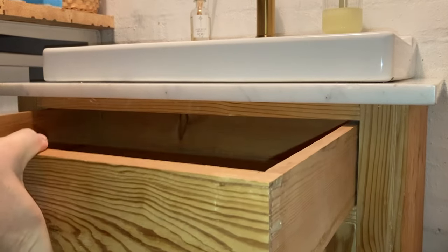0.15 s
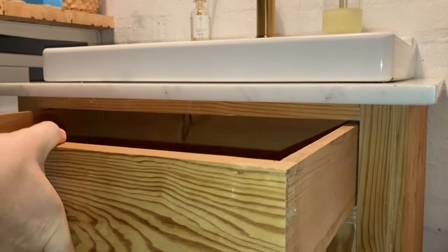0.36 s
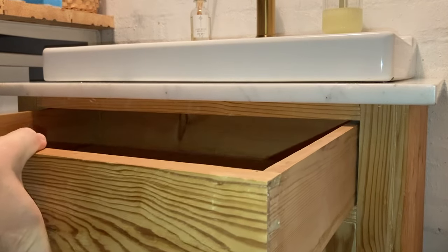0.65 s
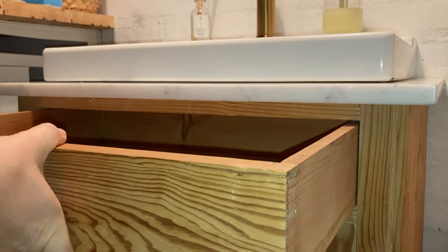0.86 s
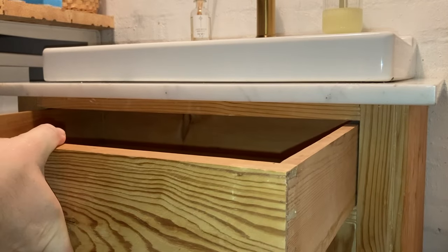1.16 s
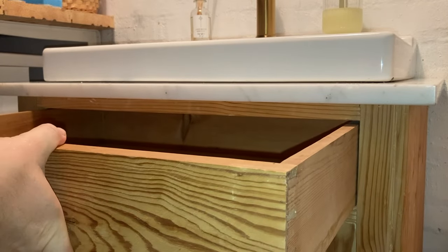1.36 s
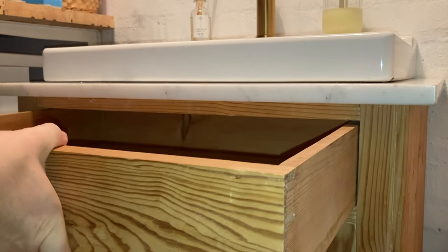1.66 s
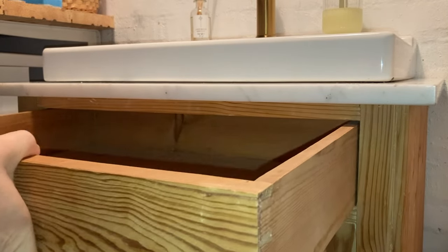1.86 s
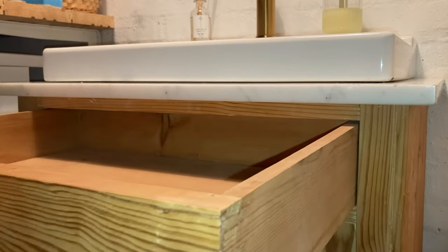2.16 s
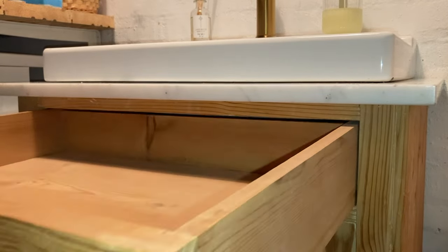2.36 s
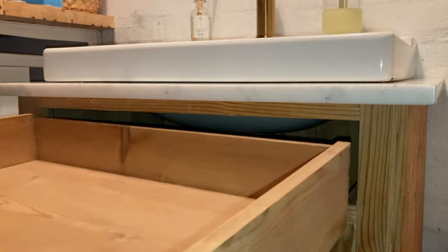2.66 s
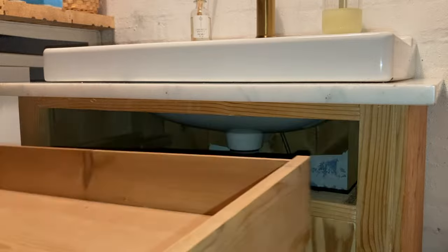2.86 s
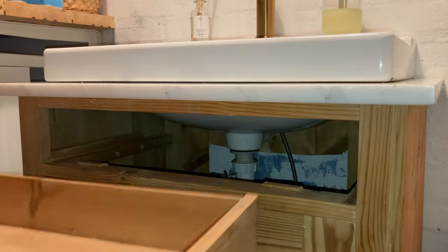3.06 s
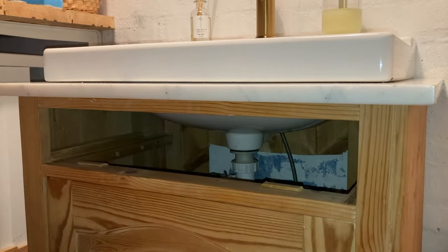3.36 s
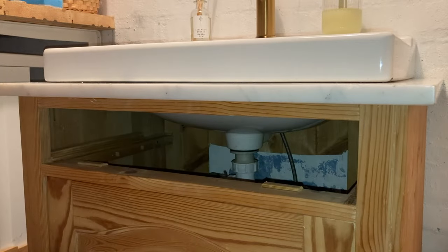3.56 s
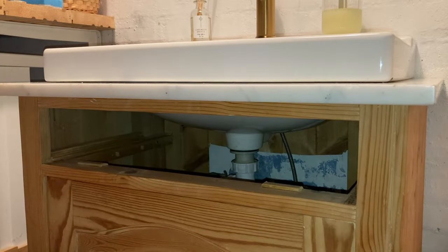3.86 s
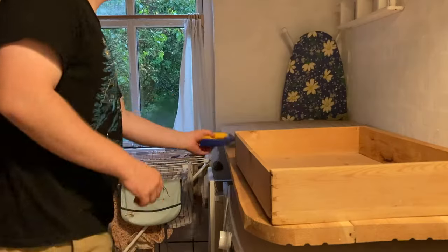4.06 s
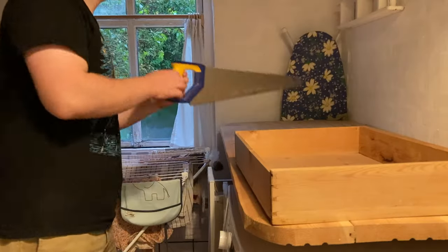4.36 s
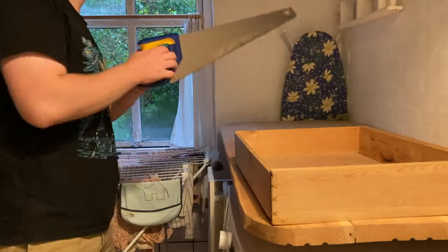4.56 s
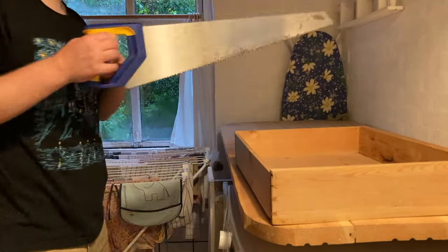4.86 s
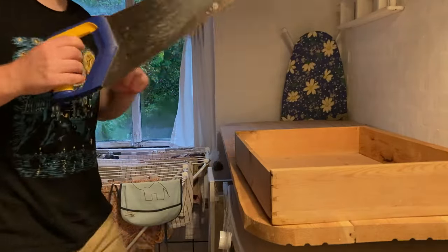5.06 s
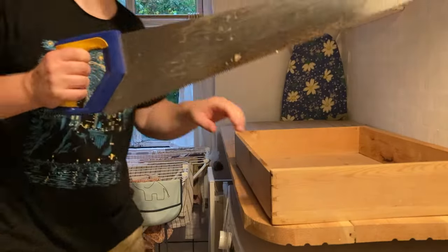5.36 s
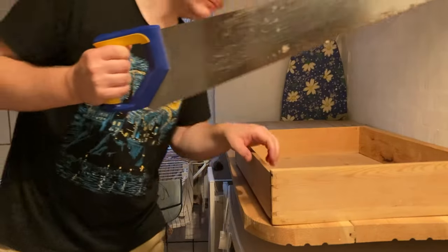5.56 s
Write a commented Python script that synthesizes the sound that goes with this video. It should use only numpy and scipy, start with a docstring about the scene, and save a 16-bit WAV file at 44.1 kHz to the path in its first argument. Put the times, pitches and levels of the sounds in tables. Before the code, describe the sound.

Close mono pickup in a small, lively room. A hollow wooden box bumps and rubs, hits its stop hard twice, then bumps softly again and slides out over uneven runners, dropping off with a dull thump. After light ticks and rustling, the place changes to a softly humming workroom: one short steel-on-wood scrape, faint airy blade swishes, a tiny ting and clothing movements.

```python
"""A pine drawer in a bathroom cabinet is jiggled on its wooden runners, knocks twice on its stop and is pulled out.
Clicks and short shudders ring the modes of its box; noise bursts crack; friction noise rubs and wavering sines groan.
Afterwards, in a workroom, a handsaw is dragged off a bench: rasping noise rings steel and wood.
The raised blade swishes as filtered noise and tings in gliding sines. Noise also makes clothes, air, hum and hiss.
"""
import sys
import numpy as np
from scipy import signal
from scipy.fft import rfft, irfft
from scipy.io import wavfile

SR = 44100
rng = np.random.default_rng(int(sys.argv[2]) if len(sys.argv) > 2 else 0)


def generate_wav(signal):
    """Clip the signal to [-1, 1] and save it as 16-bit WAV at the path in sys.argv[1]."""
    frames = np.transpose(np.atleast_2d(signal))
    scaled = np.clip(frames, -1, 1) * 32767
    pcm = np.round(scaled).astype(np.int16)
    wavfile.write(sys.argv[1], SR, pcm)


N = 251800  # samples

# modes of the drawer box, before the ring limit: mode_hz, level_db (relative), t60_s
BOX_MODES = [(65, -47.5, 0.72), (85.7, -39, 0.21), (117.5, -33.5, 0.45), (136, -35.5, 0.18),
             (165.3, -44, 0.28), (195.6, -45.5, 0.17), (276.5, -22.5, 0.058), (320.4, -20.5, .13),
             (355, -28, 0.27), (425, -27, 0.069), (525, -16, 0.018), (567, -30.5, 0.15),
             (608.4, -31, 0.097), (700, -23.5, 0.055), (815, -30.5, 0.041), (853, -29.5, 0.18),
             (978.3, -18.5, 0.033), (984, -34, 0.083), (1136, -36, 0.15), (1393, -22.5, 0.021),
             (1712, -35, 0.05), (1866, -24.5, 0.02), (2416, -31.5, 0.025), (2638, -29.5, .024),
             (3282, -31, 0.027), (4383, -41.5, 0.027), (5355, -39.5, 0.019)]
LONGEST_RING_S, LONGEST_RING_CYCLES = 0.29, 90  # wood never rings longer than this


def drawer(force, travel_s=0.0016):
    """The box rings, damped by the hand; bending waves carry highs across the boards sooner than lows."""
    out = np.zeros(N)
    for k, (hz, db, t60) in enumerate(BOX_MODES):
        t60 = min(t60, LONGEST_RING_S, LONGEST_RING_CYCLES / hz)
        mode = (-1) ** k * from_db(db) * ring(force, hz, t60)
        arrival_s = travel_s * np.sqrt(500 / hz)  # travel_s is the delay at 500 Hz
        add(out, arrival_s, mode)
    return out


# hard knocks on the stop, one corner about 5 ms ahead of the other:
# start_s, strength_db (relative), corner_hz (brightness of the click)
STOP_KNOCKS = [(0.3122, 3.5, 8950), (0.3169, -6.5, 3017), (0.8166, 2.5, 8000), (0.8217, -5.5, 2910)]
SHORTEST_SHUDDER_S = 0.0016


def blows(shudder_cycles=0.78):
    """Force on the box: sharp clicks at the stop, short rounded shudders for jolts and ticks."""
    force = np.zeros(N)
    click = signal.unit_impulse(SR // 8)
    for s, db, corner_hz in STOP_KNOCKS:
        add(force, s, from_db(db) * passband(click, corner_hz, "low", order=1))
    for s, db, hz in pushes():
        width_s = max(shudder_cycles / hz, SHORTEST_SHUDDER_S)
        t = np.arange(-3 * width_s, 3 * width_s, 1 / SR)
        shudder = np.cos(2 * np.pi * hz * t) * np.exp(-(t / width_s) ** 2)
        add(force, s + t[0], from_db(db) * shudder / (width_s * SR))
    return force


# soft jolts on the runners, then two light ticks after the pull:
# centre_s, tap_db (relative), tap_hz, thud_db (relative)
JOLTS_AND_TICKS = [(.008, -35.5, 540, -12), (.068, -9, 690, 9.5), (.109, -3.5, 610, 6.5),
                   (0.577, -14.5, 580, 2), (.656, -16.5, 560, -1), (1.473, -24.5, 800, -12.5),
                   (1.552, -36.5, 590, -11), (1.648, -28, 720, -10), (1.749, -9.5, 640, 6),
                   (1.787, -13.5, 650, 3.5), (1.824, -16.5, 590, -1.5), (2.622, -44.5, 806, -9.5),
                   (3.226, -31.5, 1270, -27.5), (3.828, -40, 330, -36)]
# low shudders that follow each tap: delay_s, pitch_hz, level_db (relative to the thud)
SETTLING_SHUDDERS = [(.016, 180, -4.5), (.023, 320, -22), (.035, 130, -1)]
# every tap has a brighter edge and rebounds once; ratios and dB are relative to the tap
EDGE_RATIO, EDGE_DB, EDGE_LAG_S = 1.8, -4.5, 0.0022
REBOUND_RATIO, REBOUND_DB, REBOUND_S = 0.92, 0.5, 0.012


def pushes():
    """Each jolt or tick is a tap with its edge and rebound, then low settling: centre_s, level_db, pitch_hz."""
    for s, tap_db, hz, thud_db in JOLTS_AND_TICKS:
        yield s, tap_db, hz
        yield s + EDGE_LAG_S, tap_db + EDGE_DB, hz * EDGE_RATIO
        yield s + REBOUND_S, tap_db + REBOUND_DB, hz * REBOUND_RATIO
        for delay_s, low_hz, db in SETTLING_SHUDDERS:
            yield s + delay_s, thud_db + db, low_hz


# dry little catches of wood grain, and one late dry tick: start_s, level_db (relative)
CATCHES_AND_TICK = [(0.067, -46.5), (.109, -33.5), (0.571, -69), (0.661, -45), (1.472, -48.5), (1.493, -60),
                    (1.651, -49.5), (3.226, -57)]


def cracks(stop_db=-15, snap_db=-22, bite_s=0.0019):
    """The stop bites within a moment, with one crack for every knock; each catch or tick is a fresh burst."""
    out = np.zeros(N)
    stop = crack(t60=0.05, low_hz=603, high_hz=1200)
    stop = stop * np.minimum(np.arange(len(stop)) / SR / bite_s, 1)
    snap = crack(t60=0.0016, low_hz=9100, high_hz=14720)
    contact = from_db(stop_db) * stop + from_db(snap_db) * snap
    for s, db, corner_hz in STOP_KNOCKS:
        # the crack is duller than the click: half its corner frequency
        add(out, s, from_db(db) * passband(contact, 0.5 * corner_hz, "low", order=1))
    for s, db in CATCHES_AND_TICK:
        add(out, s, from_db(db) * crack(t60=0.027, low_hz=875, high_hz=3916))
    return out


def crack(t60, low_hz, high_hz):
    """The crowd of short-lived high modes right at a contact, as a decaying noise burst."""
    t = np.arange(SR // 8) / SR
    burst = rng.standard_normal(len(t)) * from_db(-60 * t / t60)
    dulled = passband(burst, high_hz, "low", order=1)
    return passband(dulled, low_hz, "high")


# the long pull, level of its rubbing: time_s, level_db (relative)
LONG_PULL = [(1.72, -81), (1.746, -67), (1.898, -62.5), (2.002, -69), (2.276, -68.5), (2.33, -64.5),
             (2.544, -60.5), (2.648, -66), (2.76, -104)]
# short hard rubs as the drawer is jiggled or binds: peak_s, length_s, level_db (relative)
BINDING_RUBS = [(.12, 0.14, -51.5), (.295, 0.35, -58.5), (.585, 0.19, -60), (.662, 0.087, -60),
                (.795, 0.21, -58.5), (1.497, .06, -56), (1.585, 0.11, -67), (1.71, 0.21, -70.5),
                (2.425, 0.41, -56)]
# colour of the hiss: frequency_hz, density_db (dB per Hz, relative)
RUB_COLOUR = [(290, -39), (500, -10.5), (537, -21.5), (668, -15), (728, -19), (794, -5), (1000, -1.5),
              (1240, -11.5), (1970, -11), (8490, -23.5), (14700, -29), (15800, -36.5)]
# colour of the runner rumble: frequency_hz, density_db (dB per Hz, relative)
RUMBLE_COLOUR = [(40, -29.5), (65, -3), (95, 7), (140, -5.5), (220, -2), (400, -28)]


def sliding(hiss_db=-3, box_db=-6, rumble_db=1, pull_db=6):
    """Wood on wood: a soft hiss, the box humming under it, and a rumble from the uneven runners."""
    pull = from_db(pull_db) * level(LONG_PULL)
    rub = pull + strokes(BINDING_RUBS, rise_share=0.62, roundness=1.4)
    hiss = colour(friction(grain_db=2.0, slip_db=3.5, slips_per_s=170), RUB_COLOUR)
    box_force = passband(friction(grain_db=1.0, slip_db=-2.0, slips_per_s=13), 600, "high", order=1)
    box = rms_one(drawer(box_force))
    rumble = colour(friction(grain_db=3.5, slip_db=2.5, slips_per_s=35), RUMBLE_COLOUR)
    rubbing = rub * (from_db(hiss_db) * hiss + from_db(box_db) * box)
    return rubbing + from_db(rumble_db) * pull * rumble


# brief groans of the runners, and a low thump (at 2.62 s) as the drawer drops off them:
# start_s, length_s, pitch_hz (centre), level_db (before the waver)
GROANS_AND_THUMP = [(1.98, 0.091, 349.7, -47.5), (2.06, 0.11, 242, -57), (2.37, 0.13, 346, -56.5),
                    (2.62, 0.063, 142, -40.5), (2.68, 0.15, 171.8, -59.5)]


def groans_and_thump(waver=0.027):
    """Stick and slip groans on one pitch, and the drop thumps; all are short sines wavering in pitch and level."""
    out = np.zeros(N)
    for s, length, hz, db in GROANS_AND_THUMP:
        t = np.arange(round(length * SR)) / SR
        wobble = np.interp(t * 70, np.arange(SR), rng.standard_normal(SR))
        tone = np.sin(2 * np.pi * np.cumsum(hz * (1 + waver * wobble)) / SR)
        swell = np.sin(np.pi * t / length)
        add(out, s, from_db(db + 3.6 * wobble) * swell * tone)
    return out


# the saw shifts as it is gripped, then is dragged off the bench:
# peak_s, length_s, teeth_db (relative), bench_top_db (relative)
SAW_DRAGS = [(3.985, 0.078, -77.5, -57.5), (4.133, 0.21, -45.5, -43)]
BENCH_LAG_S = 0.034  # the wood speaks up a little after the teeth
# colour of the teeth: frequency_hz, density_db (dB per Hz, relative)
TEETH_COLOUR = [(800, -22), (1250, -19), (1500, -2), (1850, -1.5), (2700, -8.5), (3800, -7.5), (4800, -7),
                (6200, -6.5), (10000, -7), (14500, -1), (15800, 3.5)]
# bench resonances: centre_hz, width_hz, level_db (relative)
BENCH_MODES = [(432.3, 40, 5.5), (750, 26, -11), (970, 51, -7), (1195, 28, -6)]
# broad colour of the bench top: frequency_hz, density_db (dB per Hz, relative)
BENCH_TOP_COLOUR = [(160, -16), (240, -1.5), (340, -18), (450, 4.5), (600, 2), (700, -7), (950, -3.5),
                    (1300, -9.5), (2000, -30.5)]


def handsaw(teeth_db=-2, bench_db=-8, top_db=-4, steel_db=-11):
    """Steel teeth rasp over the bench top; the wood resonates and many close blade modes ring on."""
    rasp = friction(grain_db=5.5, slip_db=2.5, slips_per_s=140)
    bench = np.zeros(N)
    for hz, width, db in BENCH_MODES:
        t60 = np.log(1000) / np.pi / width
        bench += from_db(db) * width * ring(rasp, hz, t60)
    wood = from_db(bench_db) * rms_one(bench) + from_db(top_db) * colour(rasp, BENCH_TOP_COLOUR)
    teeth = strokes(SAW_DRAGS, rise_share=0.31, roundness=1.84) * colour(rasp, TEETH_COLOUR)
    presses = [(s + BENCH_LAG_S, length, db) for s, length, _, db in SAW_DRAGS]
    pressure = strokes(presses, rise_share=0.44, roundness=1.37)
    steel = rms_one(sum(ring(teeth, hz, t60=0.064) for hz in rng.uniform(2300, 12000, size=30)))
    return from_db(teeth_db) * teeth + from_db(steel_db) * np.std(teeth) * steel + pressure * wood


# the blade is swung up: peak_s, length_s, level_db
BLADE_SWINGS = [(4.39, 0.26, -72), (4.575, 0.23, -69.5), (4.82, 0.17, -77.5)]
# colour of the swish: frequency_hz, density_db (dB per Hz, relative)
SWISH_COLOUR = [(900, -20.5), (1500, -2.5), (2000, 0.5), (2600, -8.5), (4000, -14.5), (9000, -13)]
# the raised blade flexes with a faint ting: start_s, level_db (relative)
BLADE_FLEXES = [(4.843, -60)]
# blade modes before stiffening: mode_hz, level_db (relative), t60_s
BLADE_MODES = [(1200, -4, 0.054), (1650, -1, .07), (1930, -2, 0.095), (2300, -4.5, 0.14), (2620, -11, 0.35),
               (2690, -9.5, 0.79)]


def blade(stiffening=0.16, bend_s=0.02, shiver=0.029):
    """Thin steel swishes through the air, then tings; bending stiffens it, so its modes glide up, shivering."""
    out = strokes(BLADE_SWINGS, rise_share=0.41, roundness=1.7) * colour(rng.standard_normal(N), SWISH_COLOUR)
    t = np.arange(SR // 2) / SR
    glide = stiffening * (1 - np.exp(-t / bend_s))
    ting = np.zeros(len(t))
    for hz, db, t60 in BLADE_MODES:
        wobble = np.interp(t * 300, np.arange(SR), rng.standard_normal(SR))
        pitch_hz = hz * (1 + glide + shiver * wobble)
        ting += from_db(db - 60 * t / t60) * np.sin(2 * np.pi * np.cumsum(pitch_hz) / SR)
    for s, db in BLADE_FLEXES:
        add(out, s, from_db(db) * ting)
    return out


# clothes and hands: peak_s, length_s, level_db (relative)
RUSTLES = [(3.362, 0.088, -63.5), (3.464, 0.065, -61.5), (3.548, 0.052, -66.5), (3.67, 0.19, -70),
           (3.84, 0.36, -69), (3.99, 0.13, -75), (4.41, .2, -71.5), (4.752, 0.21, -64),
           (5.008, 0.14, -62.5), (5.22, .12, -66.5), (5.408, 0.17, -63), (5.55, 0.21, -79.5)]
# colour of the cloth: frequency_hz, density_db (dB per Hz, relative)
CLOTH_COLOUR = [(300, -26), (700, -6.5), (1800, -4), (3500, -10), (6000, -7.5), (10000, -11), (15000, -8)]


def clothes(cloth_db=-1):
    """Clothes and hands rustle: grainy friction noise swelling with each movement."""
    movement = strokes(RUSTLES, rise_share=0.43, roundness=1.6)
    grain = friction(grain_db=4.5, slip_db=1.5, slips_per_s=69)
    return from_db(cloth_db) * movement * colour(grain, CLOTH_COLOUR)


# colour of the still air: frequency_hz, density_db (dB per Hz, relative)
AIR_COLOUR = [(45, -9), (60, 2), (90, -10.5), (150, -8.5), (300, -9), (600, -15.5), (1500, -20),
              (4000, -26), (9000, -31), (15000, -30)]
AIR_DB = -68.5


def still_air():
    """Steady noise, densest in the bass."""
    return from_db(AIR_DB) * colour(rng.standard_normal(N), AIR_COLOUR)


# low hum near 52 Hz and hiss above 1 kHz: frequency_hz, density_db (dB per Hz, relative)
HUM_AND_HISS_COLOUR = [(42, -25), (52, 20), (70, -20), (150, -29), (400, -39), (1000, -8)]
WORKROOM_S, WORKROOM_DB = 3.85, -77.5  # start and level of this noise


def workroom_hum_and_hiss():
    """Noise with a low hum near 52 Hz and a hiss above 1 kHz, present from the start of the workroom on."""
    present = np.arange(N) / SR > WORKROOM_S
    return from_db(WORKROOM_DB) * present * colour(rng.standard_normal(N), HUM_AND_HISS_COLOUR)


# reverberation time: frequency_hz, t60_s
REVERB_T60 = [(70, .52), (130, .38), (300, .45), (700, .36), (1840, .33), (4850, .27), (12800, .21)]
# reverberation strength: frequency_hz, level_db (relative)
REVERB_GAIN = [(70, -3), (130, -5.5), (220, 0.5), (330, -3.5), (700, -5.5), (1500, -2.5), (3000, -3),
               (6000, -5), (14000, -14)]


def room_tail(first_echo_s, build_s):
    """Diffuse reflections of a small hard room, dying faster in the treble."""
    t = np.arange(SR) / SR
    white = rng.standard_normal((3, SR))
    tail = np.zeros(SR)
    edges_hz = 50 * 2 ** np.arange(0, 8.5, 0.2)
    onset = np.clip((t - first_echo_s) / build_s, 0, 1)
    for k, (low, high) in enumerate(zip(edges_hz, edges_hz[1:])):
        hz = np.sqrt(low * high)
        # reversed: at full strength from the start
        steady = passband(white[k % len(white)], [low, high], "band")[::-1]
        band = steady * onset * from_db(-60 * t / at_hz(REVERB_T60, hz))
        tail += rms_one(band) * np.sqrt(2 * (high - low)) / SR * from_db(at_hz(REVERB_GAIN, hz))
    return tail


def friction(grain_db, slip_db, slips_per_s):
    """Countless tiny collisions of uneven size, bunched by stick and slip."""
    knots = np.arange(N) / SR * slips_per_s
    slips = np.interp(knots, np.arange(N), rng.standard_normal(N))
    unevenness_db = grain_db * rng.standard_normal(N) + slip_db * slips
    return rms_one(rng.standard_normal(N) * from_db(unevenness_db))


def strokes(rows, rise_share, roundness):
    """Gain of hand strokes: each swells to its peak and fades, 20 dB down at both ends of its length."""
    t = np.arange(N) / SR
    gain = np.zeros(N)
    for row in rows:
        peak_s, length_s, db = row[:3]
        away = (t - peak_s) / length_s
        reach = np.minimum(np.maximum(-away / rise_share, away / (1 - rise_share)), 10)
        gain += from_db(db - 20 * reach ** roundness)
    return gain


def ring(force, hz, t60):
    """A resonator: a unit click sets a decaying sine of height 1 ringing."""
    r = from_db(-60 / (t60 * SR))
    w = 2 * np.pi * hz / SR
    return signal.lfilter([0, np.sin(w)], [1, -2 * r * np.cos(w), r * r], force + 1e-18)


def colour(x, spectrum):
    """Give a steady noise a spectrum that falls away below its lowest point; rms 1."""
    hz = np.arange(N // 2 + 1) * SR / N
    skirt = np.minimum(hz / spectrum[0][0], 1) ** 2
    return rms_one(irfft(rfft(x) * from_db(at_hz(spectrum, hz)) * skirt, N))


def passband(x, hz, kind, order=2):
    """Causal Butterworth filter."""
    corner = np.clip(hz, 10, 0.45 * SR)
    return signal.sosfilt(signal.butter(order, corner, kind, fs=SR, output="sos"), x)


def level(rows):
    """Gain over time from a dB column, practically silent outside its span."""
    rows = np.array(rows)
    return from_db(np.interp(np.arange(N) / SR, rows[:, 0], rows[:, 1], left=-140, right=-140))


def at_hz(points, hz):
    """Read a table on a log-frequency axis."""
    points = np.array(points)
    return np.interp(np.log(hz + 1e-9), np.log(points[:, 0]), points[:, 1])


def from_db(db):
    """Decibels to gain."""
    return 10 ** (np.asarray(db) / 20)


def rms_one(x):
    """Scale to unit rms."""
    return x / np.sqrt(np.mean(x ** 2) + 1e-20)


def add(track, s, sound):
    """Mix a sound into a track at a time in seconds."""
    start = max(round(s * SR), 0)
    track[start:start + len(sound)] += sound[:N - start]


def scene():
    """Drawer and saw with their reflections, over the dry background, at one microphone."""
    tail = room_tail(first_echo_s=0.0034, build_s=0.006)
    direct = drawer(blows()) + cracks() + sliding() + groans_and_thump() + handsaw() + blade()
    reflections = signal.fftconvolve(direct, tail)[:N]
    background = clothes() + still_air() + workroom_hum_and_hiss()
    return (direct + reflections + background)[None]


def record(dry):
    """The microphone drops the deepest bass; the top is cut steeply."""
    thinned = passband(dry, 48, "high", order=6)
    top_cut = signal.ellip(10, 0.1, 80, 15800, fs=SR, output="sos")  # ripple dB, stop dB, cutoff Hz
    return signal.sosfilt(top_cut, thinned)


dry = scene()
out = record(dry)
generate_wav(out)
```